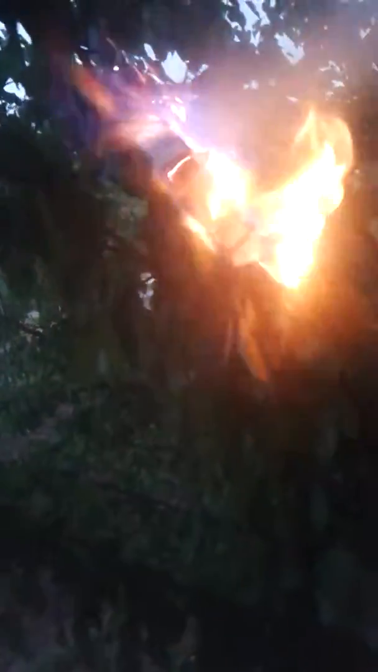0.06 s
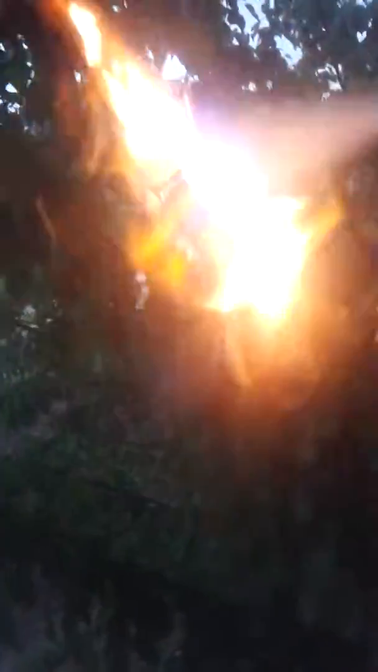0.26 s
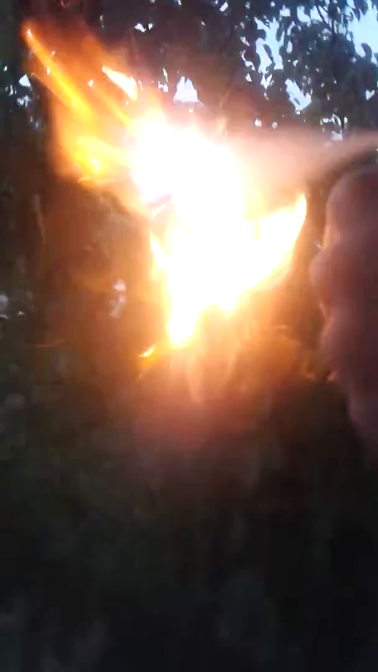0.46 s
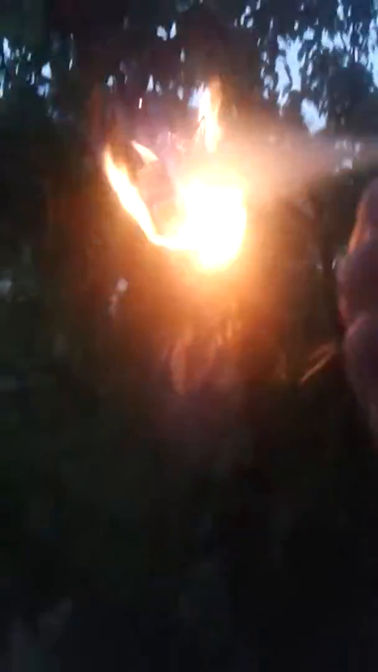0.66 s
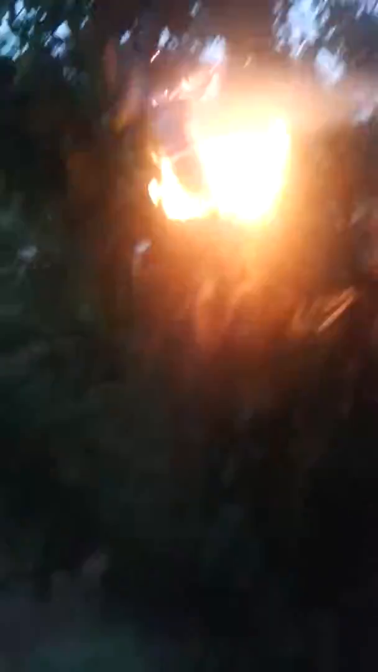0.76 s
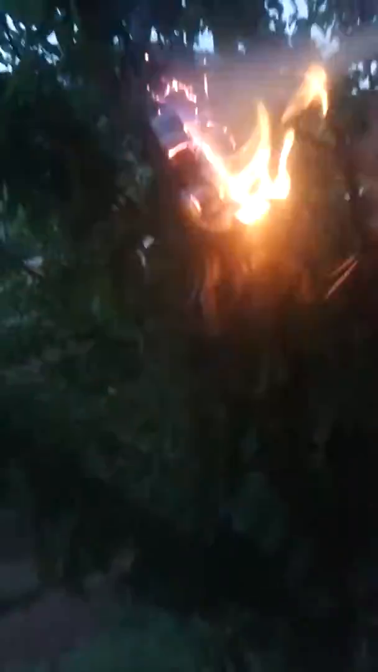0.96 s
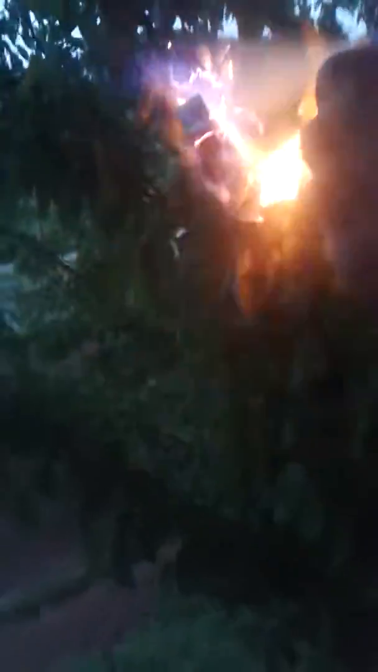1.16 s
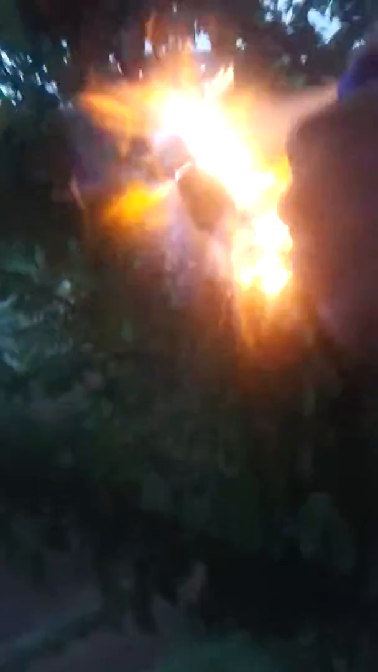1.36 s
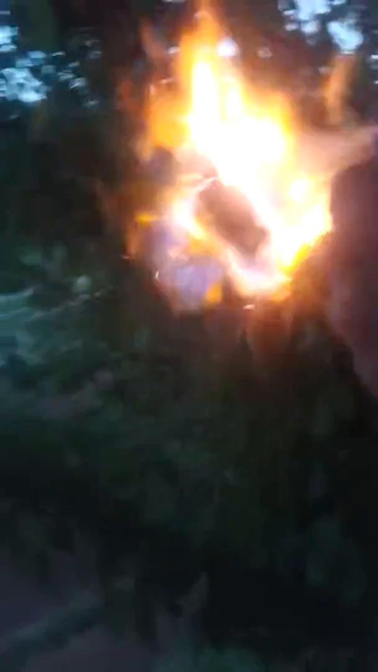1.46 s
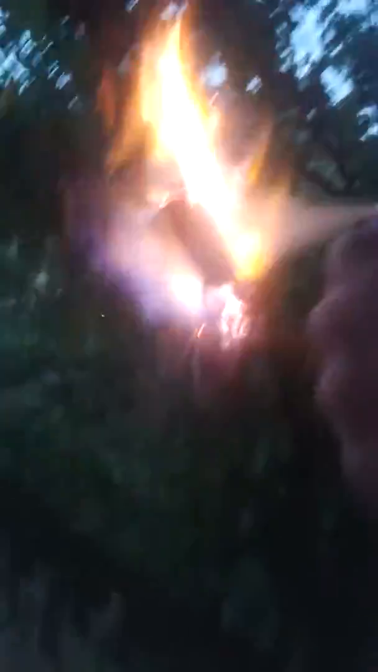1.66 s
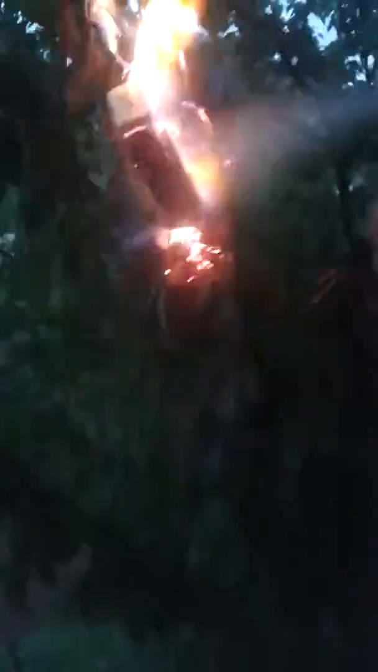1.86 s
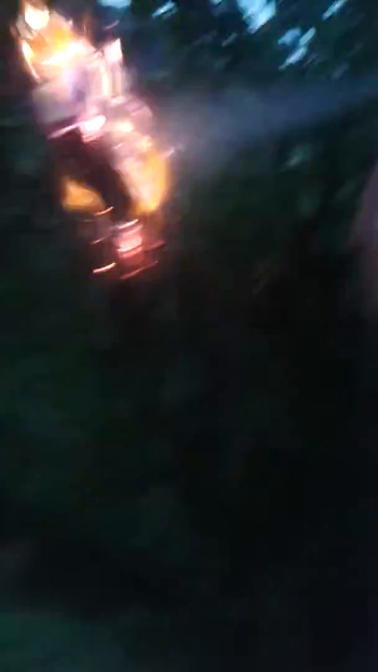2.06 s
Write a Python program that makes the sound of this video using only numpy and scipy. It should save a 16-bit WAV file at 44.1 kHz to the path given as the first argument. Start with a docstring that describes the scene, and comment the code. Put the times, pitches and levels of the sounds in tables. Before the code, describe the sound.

Fire flares in two deep, fluttering whooshes over a steady spray hiss, ending in dry snaps

```python
"""Outdoors, close by: an aerosol spray hisses onto burning paper in a tree.
The mist catches twice: the flame swells to a fluttering roar, sinks, and swells again.
As the blaze dies away the charred paper gives a few dry snaps.
Spray, flame and sizzle are coloured noises riding level curves; each snap is a short decaying ring."""
import sys
import numpy as np
from scipy import signal
from scipy.fft import rfft, irfft
from scipy.io import wavfile
from scipy.ndimage import uniform_filter1d

SR = 44100
rng = np.random.default_rng(int(sys.argv[2]) if len(sys.argv) > 2 else 0)


def log_audio(samples):
    """Write samples as a 16-bit WAV file to the path given in sys.argv[1]."""
    # one column per channel
    frames = np.atleast_2d(samples).T
    # limit to full scale, then quantise
    limited = np.clip(frames, -1, 1)
    pcm = np.round(limited * 32767).astype(np.int16)
    wavfile.write(sys.argv[1], SR, pcm)


N = 92610
T = np.arange(N) / SR  # time axis in seconds


def amp(db):
    """Turns decibels into gain."""
    return 10 ** (np.asarray(db) / 20)


def unit(x):
    """Scales a signal to rms 1."""
    return x / np.sqrt(np.mean(x ** 2) + 1e-20)


def curve(points):
    """Draws an automation curve: straight lines through (time_s, value) points."""
    return np.interp(T, *np.transpose(points))


def add(mix, start_s, sound):
    """Mixes a sound in at start_s, cutting it off at the end of the mix."""
    start = max(round(start_s * SR), 0)
    part = mix[start:][:len(sound)]
    part += sound[:len(part)]


def shaped_noise(gain):
    """Filters white noise by a gain per frequency bin, then scales it to rms 1."""
    spectrum = rfft(rng.standard_normal(N)) * gain
    return unit(irfft(spectrum, N))


def noise(colour):
    """Makes noise of rms 1 whose spectrum follows a colour table, on a log frequency axis."""
    colour_hz, colour_db = np.transpose(colour)
    bin_hz = np.fft.rfftfreq(N, 1 / SR)
    gain_db = np.interp(np.log(bin_hz + 1), np.log(colour_hz), colour_db)
    return shaped_noise(amp(gain_db))


def steadied(x, size):
    """Evens out a noise's slow chance swells by its power, smoothed twice over size samples."""
    power = uniform_filter1d(uniform_filter1d(x ** 2, size), size)
    return x / np.sqrt(abs(power) + 1e-12)


def turbulence():
    """Quick random flutter of moving gas: noise of rms 1, mostly between two corner frequencies."""
    slow_hz, fast_hz = 4, 69
    hz = np.fft.rfftfreq(N, 1 / SR) + 1e-6
    highpass = 1 + (slow_hz / hz) ** 4
    lowpass = 1 + (hz / fast_hz) ** 4
    return shaped_noise(1 / np.sqrt(highpass * lowpass))


# fader of the spray's hiss, before its sputter: time_s [s], level_db [dB]
SPRAY_LEVEL = [(0, -41), (.03, -41), (.17, -41.5), (.2, -42), (.6, -44.5), (.7, -44), (1.15, -45.5),
               (1.5, -43.5), (1.75, -42.5), (1.92, -42), (1.98, -38.5), (2.02, -42), (2.06, -47),
               (2.1, -43)]
# relative spectrum of the nozzle's hiss: freq_hz [Hz], density_db [dB per Hz]
SPRAY_COLOUR = [(200, -30), (1000, 4), (2200, 0), (3400, 3), (4600, -1.5), (5700, 2.5), (6900, 3),
                (7900, -3), (9300, -2), (10400, 1.5), (11400, 0.5), (13200, 3.5), (14500, 2.5)]


def spray(flutter_db=0.9, patch_db=2.5):
    """The nozzle's bright hiss; it sputters as a whole and, more finely, band by band."""
    hiss = noise(SPRAY_COLOUR) * amp(curve(SPRAY_LEVEL) + flutter_db * turbulence())
    frames = signal.stft(hiss, nperseg=512)[2].T  # time frames by frequency bins
    patches = rng.standard_normal(frames.shape)
    patches = uniform_filter1d(patches, size=6, axis=0)  # smooth over time
    patches = uniform_filter1d(patches, size=4, axis=1)  # smooth over frequency
    sputtered = frames * amp(patch_db * unit(patches))
    return signal.istft(sputtered.T, nperseg=512)[1][:N]


# fader of the deep rumble, before flutter: time_s [s], level_db [dB]
RUMBLE_LEVEL = [(0, -48), (.03, -40), (.11, -34), (.14, -40.5), (.18, -32.5), (.255, -34.5), (.28, -21.5),
                (.31, -28), (.365, -20.5), (.43, -17.5), (.465, -26.5), (.495, -20), (.56, -24.5),
                (.585, -32), (.635, -26.5), (.67, -51), (.695, -39), (.8, -46), (.845, -38), (.875, -44),
                (.905, -35.5), (.96, -51), (1.05, -43.5), (1.16, -38.5), (1.2, -33.5), (1.29, -31.5),
                (1.34, -24.5), (1.375, -31), (1.41, -20.5), (1.455, -22.5), (1.49, -28.5), (1.53, -19),
                (1.565, -26.5), (1.66, -29), (1.695, -25.5), (1.755, -34), (1.785, -27), (1.83, -37),
                (1.97, -37.5), (2.1, -34.5)]
# relative spectrum of the rumble: freq_hz [Hz], density_db [dB per Hz]
RUMBLE_COLOUR = [(15, -50), (28, -32), (42, -9.5), (52, -8.5), (70, -2.5), (112, 1.5), (160, 0), (198, -3),
                 (230, -22.5), (400, -29), (1500, -86)]
# fader of the brighter roar, before puffs, flutter and reflection: time_s [s], level_db [dB]
ROAR_LEVEL = [(0, -49), (.03, -38), (.17, -41.5), (.25, -35.5), (.275, -28.5), (.33, -29.5), (.385, -24.5),
              (.46, -29.5), (.53, -30.5), (.59, -37), (.635, -33.5), (.675, -46), (.8, -48), (.86, -46),
              (.95, -51), (1.02, -51), (1.13, -46.5), (1.22, -40), (1.275, -40), (1.3, -35.5),
              (1.44, -29.5), (1.495, -34.5), (1.57, -30), (1.665, -34.5), (1.73, -35), (1.81, -40),
              (1.88, -46.5), (1.935, -41), (1.98, -47), (2.03, -40), (2.1, -43)]
# relative spectrum of the roar: freq_hz [Hz], density_db [dB per Hz]
ROAR_COLOUR = [(120, -24), (240, -21.5), (275, 7.5), (350, -0.5), (480, -2), (660, -4), (840, -6.5),
               (1200, -12), (1520, -14), (1800, -21.5), (3100, -19.5), (4500, -30), (8000, -38),
               (15000, -82)]
# puffs as pockets of mist catch: centre_s [s], roar_lift_db [dB]
PUFFS = [(.5, 2.5), (.842, 3.5), (1.154, 12.5), (1.203, 5), (1.247, 8.5), (1.528, 9), (1.693, 7.5),
         (2.005, 6)]
# reflection from a near surface, shifting as flame and hand move: time_s [s], delay_s [s]
ECHO_DELAY = [(0, .00235), (.45, 0.0023), (.9, 0.0021), (1.28, 0.0019), (1.6, 0.00207), (2.1, 0.002)]


def flame(flutter):
    """A deep rumble and a brighter, puffing roar flutter together; a close reflection colours the roar."""
    rumble_flutter_db, roar_flutter_db = 1.5, 2
    puff_width_s = 0.009  # from the centre of a puff until its lift in dB falls to 1/e
    echo_gain = 0.37

    rumble = steadied(noise(RUMBLE_COLOUR), size=2000)
    rumble = rumble * amp(curve(RUMBLE_LEVEL) + rumble_flutter_db * flutter)

    puffs_db = sum(lift_db * np.exp(-((T - centre_s) / puff_width_s) ** 2)
                   for centre_s, lift_db in PUFFS)
    roar = steadied(noise(ROAR_COLOUR), size=800)
    roar = roar * amp(curve(ROAR_LEVEL) + puffs_db + roar_flutter_db * flutter)
    echo = np.interp(T - curve(ECHO_DELAY), T, roar, left=0)
    coloured_roar = (roar + echo_gain * echo) / (1 + echo_gain ** 2)
    return rumble + coloured_roar


# fader of the burning paper's sizzle, before flutter and grain: time_s [s], level_db [dB]
SIZZLE_LEVEL = [(0, -55), (.3, -48), (.6, -46), (.7, -53.5), (1.15, -52), (1.35, -42.5), (1.55, -40),
                (1.76, -41.5), (1.82, -48.5), (1.9, -46.5), (2.1, -46)]
# relative spectrum of the sizzle: freq_hz [Hz], density_db [dB per Hz]
SIZZLE_COLOUR = [(400, 13), (1500, 1), (3400, 1), (5500, 2), (7000, -9), (8500, -13), (14500, -47)]


def sizzle(flutter, flutter_db=2.0, grain_db=2):
    """Burning paper: a finely grained noise, fanned by the flame's flutter."""
    grains = unit(uniform_filter1d(rng.standard_normal(N), size=40))
    level_db = curve(SIZZLE_LEVEL) + flutter_db * flutter + grain_db * grains
    return noise(SIZZLE_COLOUR) * amp(level_db)


def snap(peak_db, ring_hz, rise_s):
    """A fibre breaks: a few cycles that swell and die within a millisecond or two."""
    t = T[:512]
    age = t / max(rise_s, 1e-5)
    envelope = age * np.exp(1 - age)  # reaches 1 at rise_s
    return -amp(peak_db) * envelope * np.sin(2 * np.pi * ring_hz * t)


# dry snaps of the charred paper: start_s [s], envelope peak_db [dB], ring_hz [Hz], rise_s [s]
SNAPS = [(1.7722, -26.5, 3400, .0003), (1.8394, -17, 2100, 0.0002), (1.9576, -23.5, 4000, 0.00035),
         (1.964, -26, 4060, 0.00027), (2.0841, -25.5, 4700, 0.00014)]


def snaps():
    """Places each breaking fibre on an otherwise silent track."""
    track = np.zeros(N)
    for start_s, peak_db, ring_hz, rise_s in SNAPS:
        add(track, start_s, snap(peak_db, ring_hz, rise_s))
    return track


def scene():
    """Spray, flame and paper in the open air; one flutter moves both flame and sizzle."""
    flutter = turbulence()
    mix = spray() + flame(flutter) + sizzle(flutter) + snaps()
    return mix[None]


def record(dry):
    """The recorder's band limit: a steep lowpass."""
    cutoff_hz = 14620
    lowpass = signal.firwin(511, cutoff_hz, window=("kaiser", 9), fs=SR)
    return signal.oaconvolve(dry, lowpass[None], "same")


dry = scene()
out = record(dry)
log_audio(out)
```